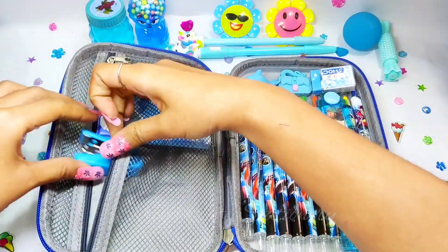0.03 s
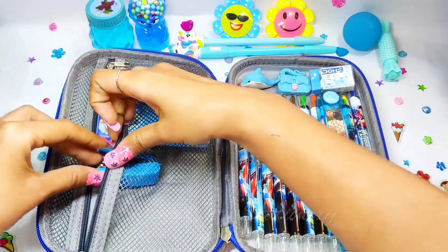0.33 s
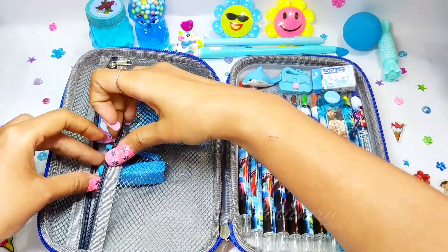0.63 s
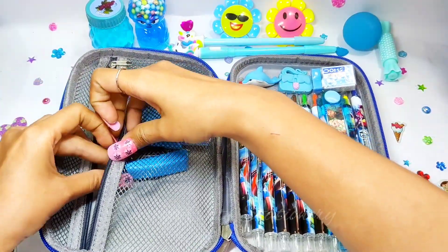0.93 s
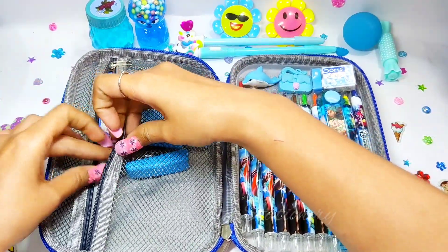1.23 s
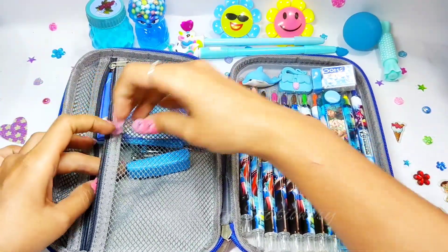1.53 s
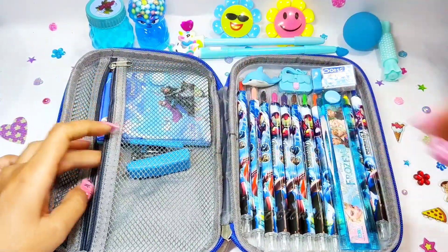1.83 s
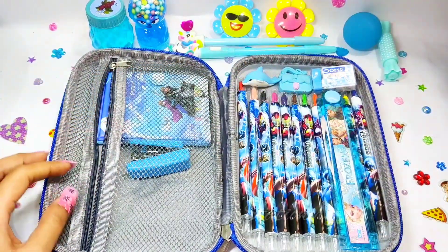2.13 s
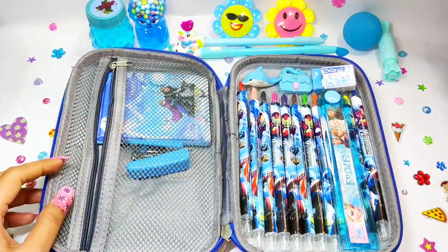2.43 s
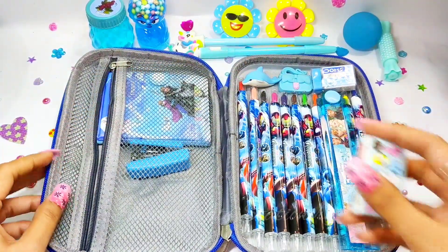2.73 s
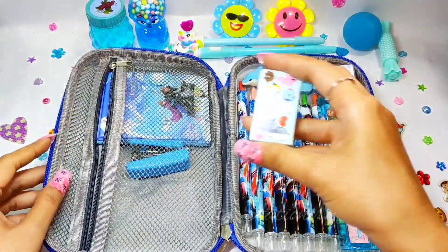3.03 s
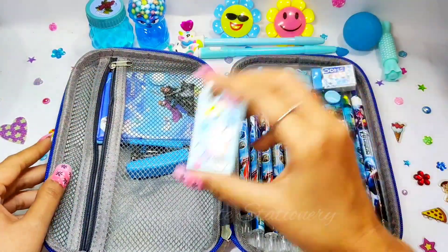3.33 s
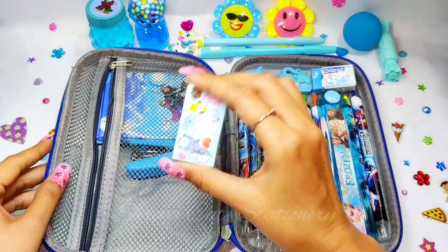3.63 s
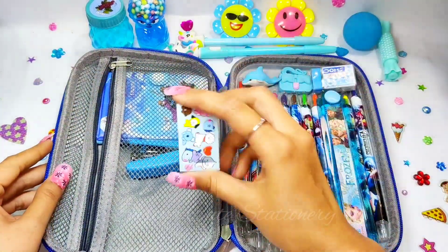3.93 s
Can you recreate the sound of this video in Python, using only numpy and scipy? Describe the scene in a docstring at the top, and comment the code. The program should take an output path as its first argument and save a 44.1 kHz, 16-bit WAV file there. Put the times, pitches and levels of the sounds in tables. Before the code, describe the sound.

In a small room, plastic items softly scrape and tick in a pencil case pocket. Brighter scrapes follow as a small box is picked up, then comes the main sound, its loud, quick rattle close to the microphone.

```python
"""A small box is shaken about six times a second: its contents slide and knock against each end,
and the hardest knocks overload the recorder. Leading up to it, fingers push stationery into the mesh
pocket of a pencil case: plastic items scrape, tick and tap, the padded case thumps, the mesh brushes
the hand and the box is picked up. Rubs are streams of tiny slips; hits are short chatters that ring
a body. It all plays close to the microphone in a small room, over a faint table rumble."""
import sys
import numpy as np
from scipy import signal
from scipy.fft import rfft, irfft, next_fast_len
from scipy.io import wavfile
from scipy.ndimage import uniform_filter1d, map_coordinates

SR = 44100
rng = np.random.default_rng(int(sys.argv[2]) if len(sys.argv) > 2 else 0)


def inscribe(sig):
    """Save sig as 16-bit PCM at rate SR to the path in sys.argv[1].

    A 1-D sig is mono; a 2-D sig holds one channel per row.
    Samples are clipped to [-1, 1] before scaling.
    """
    pcm = np.round(np.clip(np.atleast_2d(sig).T, -1, 1) * 32767)
    wavfile.write(sys.argv[1], SR, pcm.astype(np.int16))


N = 176400

# Rubbing strokes. Each row: start and end in seconds, then rub level, hiss level, swell across the
# stroke and gloss on the top treble, all in dB.
POCKET_SLIDES = [(0, .06, -54.5, -43.5, -1, -2.5), (.1, .19, -62.5, -58, -6, 0),
                 (.212, .236, -52, -39, 3, -4), (.285, .45, -55, -52.5, -3.5, -8.5),
                 (.592, .612, -53, -49.5, 9.5, -4), (.658, .772, -54, -45.5, 1.5, -9),
                 (.787, .852, -48, -37, -0.5, -4.5), (.86, .905, -55.5, -53, 0, 2),
                 (.91, 1.1, -71.5, -69.5, -3.5, 2), (.988, 1.01, -56.5, -72, -2, 0),
                 (1.102, 1.187, -55, -55.5, 6, 0)]
MESH_BRUSHES = [(1.353, 1.39, -59, -65.5, -2, -4), (1.395, 1.495, -42.5, -44, 9, -2),
                (1.5, 1.563, -65.5, -51, 4, -6), (1.826, 1.891, -68.5, -57.5, -1, -7)]
PICKUP_SCRAPES = [(2.148, 2.2, -54.5, -65.5, -8, -4), (2.204, 2.232, -43.5, -44, 0, -8),
                  (2.276, 2.303, -41.5, -38, 0.5, -10), (2.32, 2.324, -57, -70, 4, -23),
                  (2.333, 2.346, -51, -34.5, -4, 1), (2.38, 2.52, -69, -61, 2, -9),
                  (2.593, 2.65, -34, -37, 7.5, -9.5), (2.721, 2.765, -55.5, -52.5, -26, 3),
                  (2.771, 2.788, -42, -43, -6.5, -4.5), (2.925, 3.06, -58, -65.5, -3.5, 0),
                  (2.965, 2.98, -59, -63, -9, -1), (3.09, 3.115, -38.5, -38.5, 1, -5.5),
                  (3.125, 3.164, -65.5, -66, 25, -4)]
# Tone curves. Each row: frequency in Hz, relative level in dB.
POCKET_TONE = [(300, 3.5), (700, -5), (1000, 3.5), (1300, 2), (1900, 11), (2600, -4.5), (4400, -17),
               (5400, -9), (6400, -5.5), (7400, -15.5), (8650, -13.5), (9500, -18.5), (15500, -23)]
MESH_TONE = [(300, 0), (540, 16), (700, 5), (1050, 12.5), (2000, 6), (3400, -6), (4300, -13.5),
             (6000, -4.5), (7500, -12.5), (10000, -17.5), (15000, -21)]
PLASTIC_TONE = [(150, -15.5), (450, -13.5), (680, -10), (1050, 0), (2400, -1.5), (3100, -6), (3800, -4),
                (4500, -8.5), (5600, 5), (6400, 4.5), (7300, -4), (9000, -6.5), (15500, -9)]
AIR_TONE = [(15, -16), (48, 13.5), (75, -13.5), (130, -2.5), (260, -14.5), (600, -26), (2000, -35),
            (6000, -36.5), (9000, -33), (16000, -56)]
RUMBLE_TONE = [(20, 1.5), (50, -2.5), (110, -5.5), (220, -14.5), (600, -43.5), (3000, -82)]
# Resonances of the mesh and zip, and of the box. Each row: centre in Hz, width in Hz, relative peak in dB.
POCKET_MODES = [(4080, 32, 8), (5650, 53, 4.5), (6360, 62, -4), (8660, 70, -2)]
BOX_MODES = [(740, 360, -4), (979, 74, 7), (1288, 28, 4), (1624, 280, 1.5), (1790, 230, 5), (1957, 47, 5),
             (2216, 85, 1.5), (2468, 175, 7.5), (2635, 240, -1), (2720, 86, -5.5), (3365, 120, -6),
             (3760, 245, -3), (4080, 420, -6.5), (4770, 240, -0.5), (5230, 120, 2), (5464, 160, 7),
             (5794, 120, 3.5), (6090, 100, 0.5), (6660, 61, -1.5), (7480, 1400, -11), (11080, 870, -9),
             (16200, 9300, -18)]
# Handling bumps through the table. Each row: time in seconds, level in dB.
TABLE_BUMPS = [(0.942, -48), (1.055, -44.5), (1.097, -45), (2.259, -44), (3.03, -51), (3.065, -48),
               (3.403, -42), (3.49, -46)]
# Soft thumps on the case. Each row: start in seconds, level in dB, rise time in seconds.
CASE_THUMPS = [(0.053, -36, 0.0025), (0.235, -24.5, 0.0024), (2.246, -24, 0.031), (2.261, -32, 0.034),
               (3.399, -42, .001)]
# Modes of the case. Each row: pitch in Hz, relative level in dB, seconds to fade by 60 dB.
CASE_MODES = [(208.5, 1.5, 0.052), (257, -1, 0.049), (344, -9, 0.071), (447, -7, 0.041),
              (934, -11.5, 0.057)]
# Light ticks and hard knocks. Each row: time in seconds, then relative levels in dB of the wall (low),
# ring (middle) and crack (top) registers.
PLASTIC_TICKS = [(0.056, -36, -55, -39), (0.0985, -72, -38.5, -33.5), (0.599, -37.5, -33.5, -30.5),
                 (0.987, -45.5, -85, -51), (1.162, -39, -37, -37.5), (1.4385, -28.5, -56, -26.5),
                 (1.672, -58, -69, -72), (2.205, -33.5, -25, -58), (2.211, -29, -44, -59),
                 (2.217, -27.5, -29, -60), (2.298, -30, -19, -50), (2.3655, -39, -22.5, -35),
                 (2.458, -36.5, -34.5, -81), (2.6065, -60.5, -14, -25.5), (2.6145, -17.5, -20, -56),
                 (2.641, -43, -19, -21), (2.934, -31.5, -42, -67), (2.9625, -30, -20.5, -21.5),
                 (2.989, -33, -41, -31), (3.013, -24, -44, -31), (3.043, -22, -49, -36)]
BOX_KNOCKS = [(3.208, -16, -14, -19), (3.212, -18, -15.5, -18), (3.226, -19.5, -21, -24),
              (3.236, -24, -34, -32), (3.2455, -12.5, -30, -23), (3.284, -17, -30, -13),
              (3.2905, -15.5, -8, -22), (3.302, -12.5, -14, -14.5), (3.382, -8.5, -25, -23),
              (3.4018, -12, -4, -12.5), (3.4355, -36, -14.5, -23), (3.454, -18.5, -13, -16),
              (3.4595, -31, -28, -20), (3.475, -46, -20.5, -46), (3.5572, -19.5, -4, -15.5),
              (3.5715, -16, -48.5, -33), (3.592, -19.5, -31, -35), (3.612, -23, -42, -24),
              (3.6165, -13.5, -42, -18.5), (3.6715, -26, -13.5, -36), (3.6845, -29.5, -8.5, -19),
              (3.709, -31, -13.5, -40), (3.746, -27, -18, -23.5), (3.754, -27, -26, -25),
              (3.7605, -18, -32, -50), (3.771, -43, -17.5, -26), (3.8225, -22.5, -20, -48),
              (3.834, -43.5, -15, -27.5), (3.8745, -30, -23, -31.5), (3.925, -42.5, -43.5, -56)]
# Hollow taps between items, and square hits on one box mode. Each row: start in seconds, pitch in Hz,
# level in dB.
HOLLOW_TAPS = [(0.246, 1060, -35), (0.3285, 1114, -31.5), (0.988, 1060, -36), (1.098, 990, -35.5),
               (2.143, 1280, -32.5)]
BOX_PINGS = [(3.5575, 4860, -2.5), (3.617, 2300, -7.5), (3.6848, 4710, -1), (3.7715, 5640, -3.5),
             (3.8745, 977, -10)]
# Throws of the contents at alternate ends. Each row: start in seconds, length in seconds, level in dB.
BOX_THROWS = [(3.212, 0.039, -25.5), (3.279, 0.027, -16.5), (3.366, .04, -18), (3.435, 0.033, -18),
              (3.518, 0.038, -20.5), (3.6, 0.022, -20), (3.67, 0.028, -22.5), (3.735, 0.04, -23),
              (3.815, 0.026, -24.5), (3.868, 0.017, -27), (3.9, 0.043, -51)]
# Decay of the room. Each row: frequency in Hz, seconds to fade by 60 dB.
ROOM_DECAY = [(200, 0.28), (1000, 0.15), (5500, 0.15), (14000, 0.18)]

WALL_HZ, RING_HZ = 3295, 6430  # upper edges of the wall and ring registers
RUB_EDGE_DB_PER_S, GLOSS_HZ = 1100, 7800
JUDDER_PER_S, JUDDER_DB = 160, 2  # unsteady rubbing force
RIPPLE_HZ, RIPPLE_DB = 170, 3  # spacing and depth of random peaks in a rub's tone
THROW_RISE_DB_PER_S, SETTLE_DB_PER_S = 1500, 1200
KNOCK_LOW_HZ, TIGHT_END_LOW_HZ, HOLLOW_END_LOW_HZ = 550, 703, 446  # low cuts on the box
CASE_ROOM_DB, BOX_ROOM_DB = -14, -16.5  # reverb sends


def amp(db):
    """Decibels to gain."""
    return 10 ** (np.asarray(db) / 20)


def unit(x):
    """Scale to rms 1."""
    return x / np.sqrt(np.mean(x ** 2) + 1e-20)


def along(points, hz):
    """Read a curve of (Hz, value) points on a log frequency axis."""
    freqs, values = np.transpose(points)
    return np.interp(np.log(hz + 1), np.log(freqs + 1), values)


def colour(x, gain):
    """Minimum-phase EQ: follows gain(Hz) and rings only after a hit."""
    size = 2 * next_fast_len(len(x) // 2 + 1024)
    response = np.maximum(gain(np.fft.rfftfreq(size, 1 / SR)), 1e-6)
    cepstrum = irfft(np.log(response), size)
    cepstrum[1:size // 2] *= 2
    cepstrum[size // 2 + 1:] = 0
    return irfft(rfft(x, size) * np.exp(rfft(cepstrum)), size)[:len(x)]


def below(hz, edge_hz, order=6):
    """Low-pass gain."""
    return 1 / np.sqrt(1 + (hz / edge_hz) ** (2 * order))


def above(hz, edge_hz, order=6):
    """High-pass gain."""
    return below(hz, edge_hz, order=order) * (hz / edge_hz) ** order


def resonances(modes, hz):
    """Summed power response of a set of resonances."""
    return sum(amp(db) ** 2 * (hz * width) ** 2 / ((centre ** 2 - hz ** 2) ** 2 + (hz * width) ** 2)
               for centre, width, db in modes)


def wobble(x):
    """Smooth random curve with one knot per unit of x."""
    return map_coordinates(rng.standard_normal(int(np.max(x)) + 4), [x], mode="nearest")


def add(track, start, x):
    """Mix x into the track, with start in seconds."""
    i = max(0, round(start * SR))
    track[i:i + len(x)] += x[:len(track) - i]


def grains(per_s, spread_db):
    """Tiny contacts at random moments, of random size."""
    clicks = (rng.random(N) < per_s / SR) * rng.choice([-1, 1], N)
    return clicks * amp(spread_db * np.clip(rng.standard_normal(N), -2, 2))


def rubbing(strokes, body, per_s, spread_db):
    """Friction: juddering slips make a low rub and a high hiss whose peaks shift as the contact travels."""
    slips, out = grains(per_s, spread_db), np.zeros(N)
    for start, end, rub_db, hiss_db, swell_db, gloss_db in strokes:
        length = max(end - start, .005)
        first = max(int(start * SR) - SR // 25, 0)
        stream = slips[first:int((start + length) * SR) + SR // 16]
        t = (first + np.arange(len(stream))) / SR - start
        fade_db = RUB_EDGE_DB_PER_S * (np.maximum(-t, 0) + np.maximum(t - length, 0))
        knots = rng.standard_normal(SR // 512)
        judder = map_coordinates(knots, [(t - t[0]) * JUDDER_PER_S], mode="nearest")
        travel = np.clip(t / length, 0, 1)
        force = amp(swell_db * (travel - .5) - fade_db + JUDDER_DB * judder)
        for band, db in [(below, rub_db), (above, hiss_db)]:
            surface_db = lambda f: gloss_db * above(f, GLOSS_HZ) + RIPPLE_DB * wobble(f / RIPPLE_HZ)
            gain = lambda f: body(f) * amp(surface_db(f)) * band(f, WALL_HZ) * above(f, 420, order=3)
            at_start, at_end = colour(stream, gain), colour(stream, gain)  # each gets its own ripple
            add(out, first / SR, amp(db) * force * unit((1 - travel) * at_start + travel * at_end))
    return out


def pocket_slides():
    """Items slide into the pocket, scraping narrow resonances out of the mesh and zip."""
    pocket = lambda f: amp(along(POCKET_TONE, f)) * np.sqrt(1 + resonances(POCKET_MODES, f))
    return rubbing(POCKET_SLIDES, pocket, per_s=4000, spread_db=-1.5)


def noise_bed(tone):
    """Steady noise with the given tone curve, at rms 1."""
    return unit(colour(rng.standard_normal(N), lambda f: amp(along(tone, f)) * above(f, 22, order=2)))


def air_and_table(handling, air_db=-67, rumble_db=-50, bump_width_s=.0086):
    """Quiet room air, dull bumps, and a table rumble that grows gently with the handling."""
    t = np.arange(N) / SR
    bumps = sum(amp(db) * np.exp(-.5 * ((t - time) / bump_width_s) ** 2) for time, db in TABLE_BUMPS)
    activity = np.abs(uniform_filter1d(np.abs(handling), size=2048)) ** .19
    air = amp(air_db) * noise_bed(AIR_TONE)
    return air + (bumps + amp(rumble_db) * activity) * noise_bed(RUMBLE_TONE)


def case_thumps():
    """The padded shell rings low and briefly; a soft press swells slowly."""
    out, t = np.zeros(N), np.arange(SR // 4) / SR
    for start, db, rise_s in CASE_THUMPS:
        ring = sum(amp(mode_db - 60 * t / t60) * np.sin(2 * np.pi * (hz * t + rng.random()))
                   for hz, mode_db, t60 in CASE_MODES)
        add(out, start, amp(db) * ring * (1 - np.exp(-t / rise_s)))
    return out


def strikes(hits, body, t60, chatter_s, attack_s):
    """Each blow chatters for a few milliseconds and rings the body in three registers."""
    out, t = np.zeros(N), np.arange(2048) / SR
    envelope = amp(-60 * np.maximum(t - chatter_s, 0) / t60) * (1 - np.exp(-t / attack_s))
    span = .005 * SR  # a level sets the ring's energy as if packed into 5 ms
    registers = [lambda f: below(f, WALL_HZ),
                 lambda f: above(f, WALL_HZ) * below(f, RING_HZ),
                 lambda f: above(f, RING_HZ)]
    for time, *levels in hits:
        chatter = rng.standard_normal(len(t)) * envelope
        for db, register in zip(levels, registers):
            ring = colour(chatter, lambda f: body(f) * register(f))
            add(out, time - attack_s, amp(db) * ring * np.sqrt(span / np.sum(ring ** 2)))
    return out


def plastic_ticks(level_db=-9.5):
    """Nails and plastic items catch each other in light, thin ticks."""
    thin_plastic = lambda f: amp(along(PLASTIC_TONE, f)) * above(f, 500, order=2)
    return amp(level_db) * strikes(PLASTIC_TICKS, thin_plastic, t60=.012, chatter_s=.0018, attack_s=.0012)


def pings(hits, t60=.024):
    """A square hit leaves a single mode ringing."""
    out, t = np.zeros(N), np.arange(SR // 16) / SR
    for start, hz, db in hits:
        envelope = amp(db - 60 * t / t60) * (1 - np.exp(-t * hz))
        add(out, start, envelope * np.sin(2 * np.pi * hz * t))
    return out


def mesh_brushes():
    """The mesh slips off the hand with a grainy brush."""
    return rubbing(MESH_BRUSHES, lambda f: amp(along(MESH_TONE, f)), per_s=3200, spread_db=3.5)


def box_pickup():
    """The box gives bright plastic scrapes as it is picked up."""
    return rubbing(PICKUP_SCRAPES, lambda f: amp(along(PLASTIC_TONE, f)), per_s=2400, spread_db=1.5)


def box_gain(hz, low_hz):
    """Voice of the small box above its low cut."""
    return np.sqrt(resonances(BOX_MODES, hz)) * above(hz, low_hz, order=4)


def shaken_box(knock_db=-2.5, soft_hz=11330):
    """The contents pile into each end in turn and settle: a softer rattle with hard knocks on top."""
    t, rattle = np.arange(N) / SR, np.zeros(N)
    for end, low_hz in enumerate([TIGHT_END_LOW_HZ, HOLLOW_END_LOW_HZ]):
        force = np.zeros(N)
        for start, length, db in BOX_THROWS[end::2]:
            rise_db = THROW_RISE_DB_PER_S * np.maximum(start - t, 0)
            settle_db = SETTLE_DB_PER_S * np.maximum(t - start - length, 0)
            force += amp(db - rise_db - settle_db)
        contacts = grains(per_s=1700, spread_db=4)
        wall = lambda f: box_gain(f, low_hz) * below(f, soft_hz, order=1)
        rattle += colour(contacts * force, wall) / np.std(colour(contacts, wall))
    body = lambda f: box_gain(f, KNOCK_LOW_HZ)
    knocks = strikes(BOX_KNOCKS, body, t60=.009, chatter_s=.0024, attack_s=.0008)
    return rattle + pings(BOX_PINGS) + amp(knock_db) * knocks


def room(send, onset_s=.0012):
    """The small room's reflections blur into a short tail, longest in the lows."""
    hz, t, spectrum = signal.stft(rng.standard_normal(SR // 3), SR, nperseg=256)
    envelope = amp(-60 * t / along(ROOM_DECAY, hz)[:, None]) * (1 - np.exp(-t / onset_s))
    _, tail = signal.istft(spectrum * envelope, SR, nperseg=256)
    return signal.fftconvolve(send, tail / np.linalg.norm(tail))[:N]


def scene():
    """Mono mix of the shaken box, the handling at the case, their reverb and the background bed."""
    box = shaken_box()
    rubs = pocket_slides() + mesh_brushes() + box_pickup()
    case = rubs + plastic_ticks() + pings(HOLLOW_TAPS) + case_thumps()
    reverb = room(amp(BOX_ROOM_DB) * box + amp(CASE_ROOM_DB) * case)
    return (box + case + reverb + air_and_table(box + case))[None]


def record(dry):
    """The recorder clips the hardest knocks and cuts off the very top."""
    ceiling, top_hz = .87, 15500
    clipped = np.clip(dry, -ceiling, ceiling)
    return irfft(rfft(clipped) * below(np.fft.rfftfreq(N, 1 / SR), top_hz, order=90), N)


dry = scene()
out = record(dry)
inscribe(out)
```